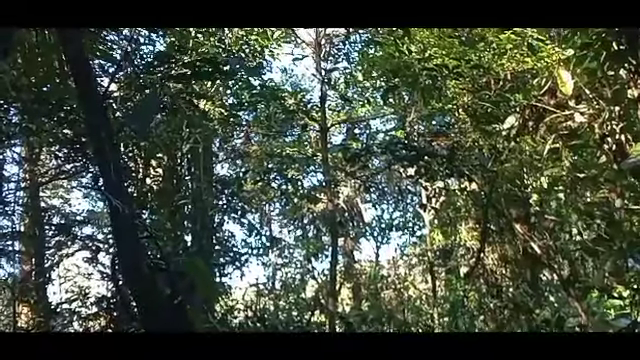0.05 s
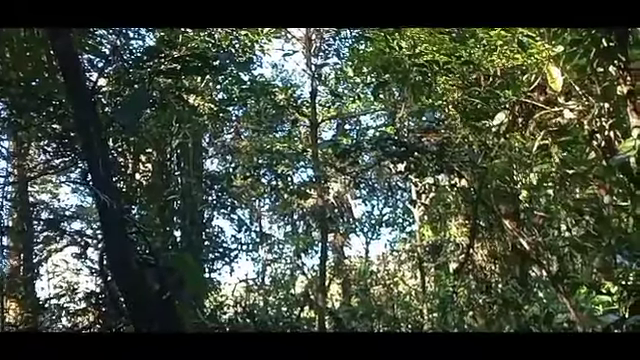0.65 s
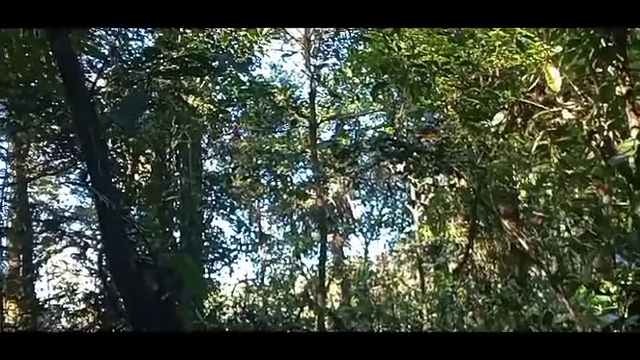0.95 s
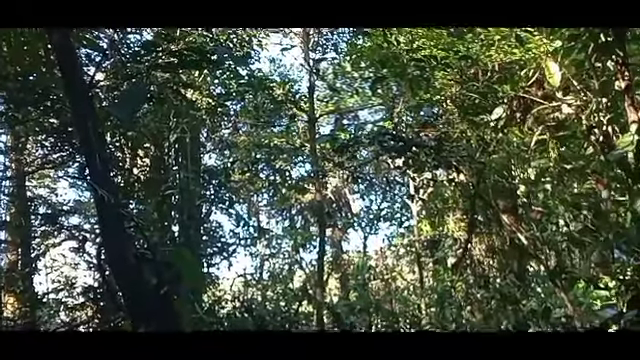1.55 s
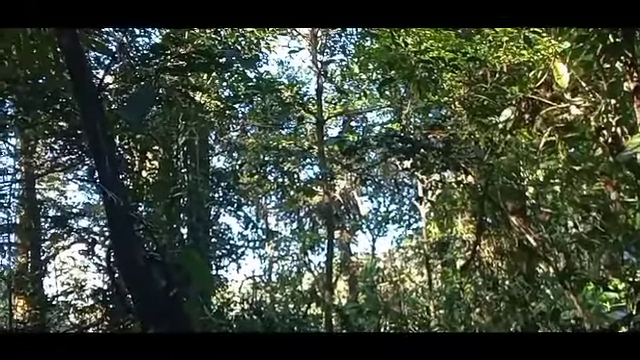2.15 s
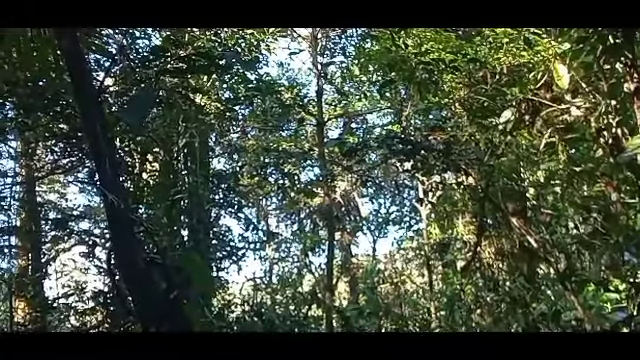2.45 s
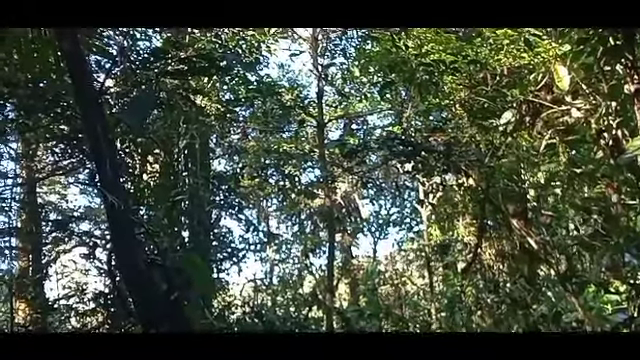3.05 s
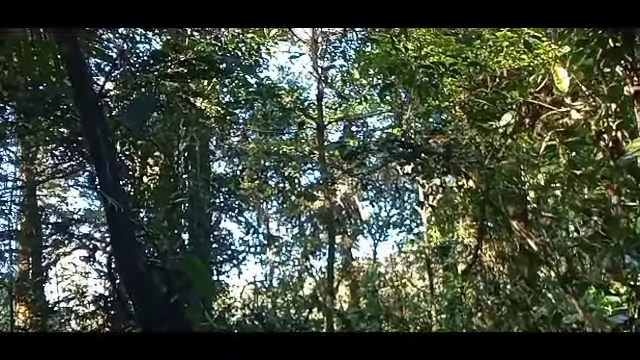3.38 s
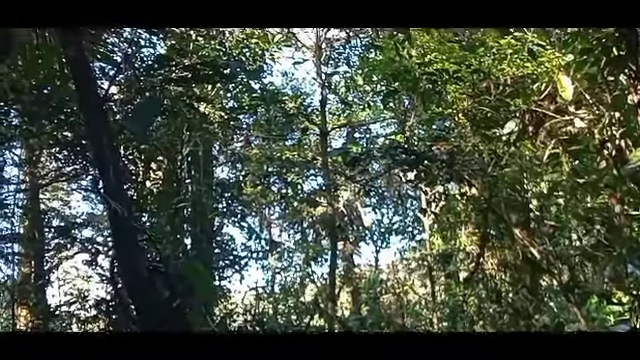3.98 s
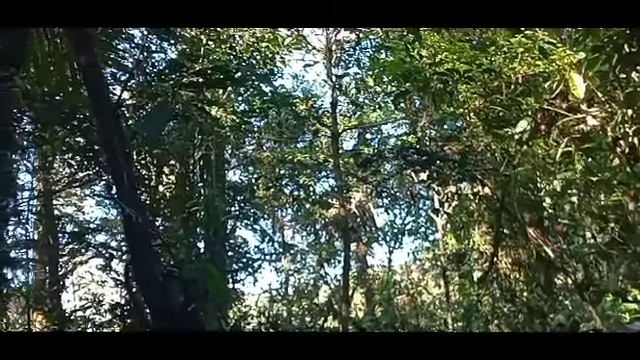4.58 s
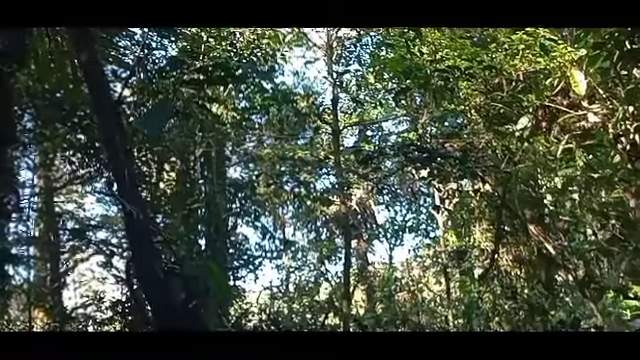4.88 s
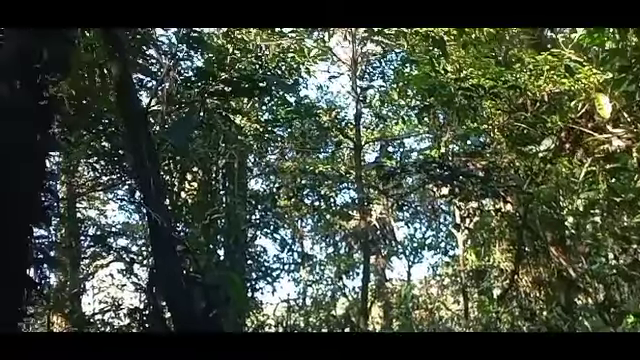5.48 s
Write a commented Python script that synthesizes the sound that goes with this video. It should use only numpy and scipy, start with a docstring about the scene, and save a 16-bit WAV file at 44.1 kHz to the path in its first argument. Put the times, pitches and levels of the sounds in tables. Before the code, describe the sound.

Small birds sing throughout in a forest, mostly to the left of the microphone. Thin, high calls slide downward over distant twittering, while one bird repeats a lower, plaintive whistle and others add short chips and raspy chatter, all lightly echoing among the trees. A few low, dull knocks sound close on the right at the start, with a brief rustle of leaves, and again a little later.

```python
"""Small birds call in a wood, mostly to the left: thin, high syrinx tones slide downward, while one bird
repeats a lower, plaintive whistle and others add short chips over a distant twittering chorus.
Scattering by foliage and trunks smears every note. Close by, a damped body gives a few low knocks on
the right, and leaves and undergrowth stir in brief bursts of noise over a faint outdoor rumble."""
import sys
import numpy as np
from scipy import signal
from scipy.fft import rfft, irfft, next_fast_len
from scipy.io import wavfile
from scipy.ndimage import map_coordinates

SR = 44100
rng = np.random.default_rng(int(sys.argv[2]) if len(sys.argv) > 2 else 0)


def transcribe(signal):
    """Save signal, clipped to [-1, 1], as a 16-bit WAV file at the path in sys.argv[1]."""
    frames = np.atleast_2d(signal).T
    limited = np.clip(frames, -1, 1)
    pcm = np.round(limited * 32767).astype(np.int16)
    wavfile.write(sys.argv[1], SR, pcm)


N = 243431
THROUGH = np.linspace(0, 1, 48)  # the way through a note, start to end


# Envelope of a slide: position_fraction, level_db
SLIDE_ENVELOPE = [(0, -4), (0.15, 3.5), (.4, 3), (.7, -1.5), (1, -6.5)]
# Long falling calls: start_s, length_s, level_db, top_hz, asymptote_hz, time_constant_s, stall_fraction
SLIDES = [(0.04, 0.18, -20.5, 7374, 3926, 0.06, .8), (1.224, 0.22, -21, 7430, 4284, 0.061, 0.3),
          (1.329, .235, -23, 7734, 3002, .15, 0.87), (2.379, 0.15, -21.5, 7274, 3944, 0.046, .7),
          (2.626, 0.21, -21, 7354, 4063, .068, 0.3), (4.161, 0.16, -21, 7270, 3818, .06, .7)]
def sliding_calls(hold_s=.016, swell_s=.014):
    """Exponential relaxation: the pitch falls steeply, then flattens, as the rough tone clears."""
    out = np.zeros((2, N))
    for start, length, db, top_hz, asymptote_hz, fall_s, stall in SLIDES:
        falling = np.maximum(THROUGH * length - hold_s, 0)
        pitches = stepped(asymptote_hz + (top_hz - asymptote_hz) * np.exp(-falling / fall_s), stall)
        waver = np.linspace(.018, .003, int(length * SR))
        tone = note(length, pitches, waver, flutter_db=2.5, edge=swell_s / length)
        level = np.interp(np.linspace(0, 1, len(tone)), *np.transpose(SLIDE_ENVELOPE))
        add(out, start, amp(db) * wood(unit(tone * amp(level)), leaves_db=-1, trunks_db=-6))
    return out


def stepped(hz, stall, step_hz=698.7):
    """Soft quantisation: a falling pitch lingers on a ladder of steps, placed anew for each call."""
    phase = 2 * np.pi * (hz / step_hz + rng.random())
    return hz + stall * step_hz / (2 * np.pi) * np.sin(phase)


# Held notes that break: start_s, hold_s, level_db, held_hz, end_hz, sag_oct_per_s
HOOKS = [(0.167, 0.042, -18.5, 7030, 5310, .2), (0.658, 0.04, -18, 7034, 4860, .2),
         (1.4, 0.05, -17, 6613, 5460, .8), (2.011, .038, -21.5, 7007, 5730, .3),
         (2.845, 0.043, -19, 6930, 5280, 2), (3.237, 0.041, -25, 6930, 4820, .2),
         (3.625, 0.016, -23, 6440, 5400, 3), (3.856, 0.027, -25.5, 7060, 5240, 1.3),
         (4.447, 0.047, -20, 7154, 5970, 3.2), (4.494, 0.054, -21.5, 5762, 4180, 0.31),
         (4.569, 0.028, -31.5, 4490, 3740, 4), (5.203, 0.029, -20.5, 7272, 5500, 1.1),
         (5.262, 0.016, -22.5, 6117, 4560, 1), (5.337, 0.029, -20.5, 7040, 5560, 2.2),
         (5.379, 0.02, -23, 5450, 4550, 7.9)]
def hooked_calls(plunge_oct_per_s=12, fade_db_per_s=273.5, accent_db=2.5, accent_s=.017):
    """A two-stage frequency sweep: a held tone sags, is accented at the break, then plunges and fades."""
    out = np.zeros((2, N))
    for start, hold, db, hz, end_hz, sag in HOOKS:
        length = hold + np.log2(hz / end_hz) / plunge_oct_per_s
        t = THROUGH * length
        pitches = hz * 2 ** (-sag * np.minimum(t, hold) - plunge_oct_per_s * np.maximum(t - hold, 0))
        tone = note(length, pitches, waver=.01, flutter_db=2, edge=.1)
        since_break = np.arange(len(tone)) / SR - hold
        accent = accent_db * np.exp(-(since_break / accent_s - .5) ** 2)
        fade = fade_db_per_s * np.maximum(since_break, 0)
        call = unit(tone * amp(accent - fade))
        echo_db = 4 + .5 * (-18 - db)  # fainter calls have a larger share of echo
        add(out, start, amp(db) * wood(call, leaves_db=echo_db, trunks_db=echo_db - 4))
    return out


# Lower whistles: start_s, length_s, level_db, end_hz, sag_hz, bend_ratio, swell_db
WHISTLES = [(0.857, 0.19, -38.5, 3297, 375, 5, 16), (1.136, 0.33, -40.5, 3209, 308, 6, -13.5),
            (1.481, .215, -39, 3146, 197.3, 5, -24.5), (1.716, 0.27, -38, 3105, 354, 6.5, -2.5),
            (2.047, 0.25, -39, 2510, 764, -1.65, -11.5), (2.859, 0.2, -49, 3190, 150, 3, 8.5),
            (3.171, 0.21, -50, 3063, 205, 4, 0), (3.466, .265, -54.5, 2758, 439, 1.5, -8),
            (4.567, 0.24, -46.5, 3324, 198.5, 7, -8), (4.874, 0.25, -42.5, 3318, 257.5, 5, 18.5),
            (5.186, 0.17, -44.5, 3098, 246, 0.5, 1.5)]
def whistler():
    """A high direct-to-reverberant ratio makes one bird's sagging whistle the driest voice."""
    out = np.zeros((2, N))
    for start, length, db, end_hz, sag_hz, bend, swell_db in WHISTLES:
        fallen = np.expm1(-bend * THROUGH) / np.expm1(-bend)  # a positive bend falls early
        pitches = end_hz + sag_hz * (1 - fallen)
        tone = note(length, pitches, waver=.005, flutter_db=3.2, edge=.24, fade_db=-swell_db)
        add(out, start, amp(db) * wood(tone, leaves_db=-7, trunks_db=-14))
    return out


# High pips, rising or falling: start_s, level_db, glide_oct
PIPS = [(1.056, -28, 0.056), (1.159, -25.5, -0.17), (2.945, -22, 0.1), (3.07, -19.5, 0.12),
        (3.177, -23.5, -0.04), (3.46, -37, 0.15), (3.522, -34, 0.18), (3.574, -29, 0.3),
        (3.799, -29.5, 0.13), (4.808, -23.5, -0.26), (4.995, -45.5, 0.26)]
# Raspy chatter: start_s, level_db, pitch_hz
CHATTER = [(0.416, -40, 4240), (0.5, -27, 5610), (1.069, -32.5, 4780), (1.714, -36.5, 6250),
           (1.79, -32.5, 4680), (1.872, -33.5, 4494), (1.95, -27.5, 4567), (2.072, -29.5, 4394),
           (2.18, -31.5, 4620), (2.261, -26.5, 4350), (2.968, -27.5, 6180), (5.0, -40, 5220)]
# Soft low peeps: start_s, level_db, pitch_hz
PEEPS = [(1.875, -37, 3780), (1.985, -42.5, 3810), (2.111, -33.5, 3753), (3.472, -40, 3780),
         (3.584, -46, 3816), (3.676, -47, 3713), (3.815, -44.5, 3733), (3.971, -56.5, 2647),
         (4.108, -48, 2820), (4.248, -53.5, 2653), (4.372, -51.5, 2818), (4.434, -54.5, 2686)]
# Hoarse far notes, mostly echo: start_s, level_db, pitch_hz
FAR_NOTES = [(1.919, -56, 2790), (1.991, -48.5, 2605), (2.279, -46, 2690), (2.46, -49, 2633),
             (4.139, -59, 2490), (4.32, -48.5, 3240)]
def chips():
    """Reverberation draws out brief frequency sweeps sung from deeper in the foliage."""
    out = np.zeros((2, N))
    for start, db, octaves in PIPS:
        tone = note(.025, glide(6450, octaves), waver=.018, flutter_db=2.5, edge=.1, fade_db=10.5)
        add(out, start, amp(db) * wood(tone, leaves_db=5.5, trunks_db=1.5))
    for start, db, hz in CHATTER:
        add(out, start, amp(db) * wood(chatter(hz), leaves_db=4, trunks_db=-1, trunks_t60=.5))
    for start, db, hz in PEEPS:
        tone = note(.047, glide(hz, octaves=.052), waver=.01, flutter_db=3, edge=.4)
        add(out, start, amp(db) * wood(tone, leaves_db=-3, trunks_db=-7))
    for start, db, hz in FAR_NOTES:
        tone = note(.047, glide(hz, octaves=.2), waver=.04, flutter_db=3, edge=.5)
        add(out, start, amp(db) * wood(tone, leaves_db=5, trunks_db=3, trunks_t60=.55))
    return out


def chatter(hz, count=5, pulse_hz=125, climb_oct=.5):
    """A fast pulse train is heard as a rasp: tiny ticks climb in pitch as they swell and die."""
    run = np.zeros(SR // 8)
    for k in range(count):
        through = (k + 1) / (count + 1)
        pitches = glide(hz * 2 ** (climb_oct * (through - .5)), octaves=.2)
        tick = note(.012, pitches, waver=.02, flutter_db=2, edge=.3)
        add(run, k / pulse_hz, np.sin(np.pi * through) ** 2 * tick)
    return run


def note(length, pitches, waver, flutter_db, edge, fade_db=0):
    """A syrinx tone with random frequency and amplitude modulation; edge is each ramp's share of it."""
    u = np.linspace(0, 1, int(length * SR))
    hz = map_coordinates(np.array(pitches, float), [u * (len(pitches) - 1)], order=2, mode="nearest")
    quaver = .9 * wobble(55, len(u)) + wobble(160, len(u)) + wobble(700, len(u))
    hz = hz * (1 + waver * quaver)
    swell = np.sin(np.pi / 2 * np.clip(np.minimum(u, 1 - u) / edge, 0, 1))
    level = flutter_db * wobble(99.4, len(u)) - fade_db * u  # breath pressure drifts over the note
    return unit(swell * amp(level) * np.sin(2 * np.pi * np.cumsum(hz) / SR))


def wood(tone, leaves_db, trunks_db, leaves_t60=.13, trunks_t60=.75):
    """Multipath propagation: direct sound, quick scatter off leaves and a long tail among trunks."""
    t = np.arange(int(.8 * SR)) / SR
    path = np.zeros((2, len(t)))
    path[0, 35] = path[1, 0] = 1  # the direct sound lags 35 samples on the left
    lumps_db = 4 * wobble(70, len(t))  # single trunks stand out in the tail
    for db, t60 in (leaves_db, leaves_t60), (trunks_db, trunks_t60):
        decay = amp(lumps_db - 60 * t / t60) * (1 - np.exp(-60 * t / t60))
        path += amp(db) * decay / np.linalg.norm(decay) * rng.standard_normal(path.shape)
    return signal.fftconvolve(tone[None], path / np.linalg.norm(path[0]), axes=1)


# Levels of the distant flock: time_s, low_voices_db, high_voices_db
CHORUS = [(0.0, -36, -28.5), (0.42, -39.5, -32), (0.649, -43, -38), (0.999, -47, -40.5), (1.121, -44, -38),
          (1.7, -44, -41.5), (1.871, -39, -36), (2.35, -39, -39), (2.951, -40.5, -29.5),
          (3.198, -46, -39.5), (3.42, -62.5, -41), (3.56, -51.5, -43.5), (3.95, -52.5, -49.5),
          (4.121, -48.5, -39.5), (4.419, -53.5, -51), (4.76, -43, -37), (4.951, -48.5, -53),
          (5.19, -54.5, -59), (5.45, -35.5, -36)]
def far_flock():
    """Superposition of two registers of distant voices, each swelling and resting in its own time."""
    times, low_db, high_db = np.transpose(CHORUS)
    t = np.arange(N) / SR
    low = amp(np.interp(t, times, low_db)) * far_voices(3650, 4700, count=9)
    high = amp(np.interp(t, times, high_db)) * far_voices(4700, 7100, count=16)
    return low + high


def far_voices(low_hz, high_hz, count, notes=24):
    """Incoherent summation: short, mostly rising notes and their echoes merge into a twitter."""
    out, lead_in = np.zeros((2, N)), SR // 2
    for bird in range(count):
        song = np.zeros(N + lead_in)
        for k, (when, size, height, slope, loud) in enumerate(rng.random((notes, 5))):
            pitches = glide(low_hz + (high_hz - low_hz) * height, octaves=.55 * (slope - .35))
            tone = note(.012 + .03 * size, pitches, waver=.02, flutter_db=3, edge=.3)
            add(song, (k + when) / notes * len(song) / SR, amp(6 * loud) * tone)
        out += wood(song, leaves_db=4, trunks_db=5)[:, lead_in:lead_in + N]
    return unit(out)


# Modes of the struck body: mean_frequency_hz, level_db, t60_s
KNOCK_MODES = [(273, -22, 0.11), (403, 0.5, 0.017), (600, 12.5, 0.0049), (1010, 1, 0.0072),
               (2090, 6, 0.0038)]
# Blows: start_s, level_db, contact_s
KNOCKS = [(0.018, -21, 0.00011), (.070, -23.5, 0.0006), (0.111, -30.5, 0.00034), (1.388, -24.5, 0.00174),
          (1.805, -41, 0.0014), (1.834, -29.5, 0.0023), (5.157, -48.5, 0.00079)]
def knocks():
    """Impact excites the modes of a heavily damped body: the longer the contact, the duller the tap."""
    out, t = np.zeros(N), np.arange(SR // 8) / SR
    onset = (1 - np.exp(-t / .0006)) ** 2
    for start, db, contact in KNOCKS:
        ring = sum(amp(level - 60 * t / t60) * np.sin(2 * np.pi * hz * (1 + rng.normal(0, .11)) * t)
                   for hz, level, t60 in KNOCK_MODES)
        push = np.hanning(int(contact * SR) + 3)
        add(out, start, amp(db) * np.convolve(ring * onset, push / push.sum()))
    return out * amp([[-12], [-1]])  # to the right


# Spectrum of stirred leaves: frequency_hz, level_db
FLURRY_SPECTRUM = [(900, -44.5), (1500, -41), (1800, -10.5), (2100, -11), (2420, 1), (2800, -17.5),
                   (3100, -22.5), (3650, 1), (5000, -17), (8000, -67.5)]
def flurry():
    """Amplitude-modulated noise: a rasping stir of leaves on the left flickers as it dies away."""
    level = amp(-26 + 2 * wobble(110, N)) * brush(start=.12, rise_s=.039, t60=.43)
    return level * noise(FLURRY_SPECTRUM) * amp([[0], [-17]])


# Soft thuds: start_s, level_db
THUDS = [(0.123, -34), (1.403, -56.5), (2.005, -60.5), (5.139, -56)]
# Spectrum of a thud: frequency_hz, level_db
THUD_SPECTRUM = [(25, -52), (40, -38), (62, 0.5), (200, 1), (350, -13), (1200, -70)]
# Dry swishes: start_s, t60_s, level_db
SWISHES = [(0.12, 0.58, -44.5), (1.89, 0.49, -56.5), (4.642, 0.33, -56.5), (5.376, 0.33, -49.5),
           (5.459, 0.19, -51)]
# Spectrum of a swish: frequency_hz, level_db
SWISH_SPECTRUM = [(100, -3), (350, 1), (800, -4), (1400, -0.5), (2400, -17), (4000, -10), (7500, -28.5),
                  (9000, -58)]
# Balance of a swish: frequency_hz, left_minus_right_db
SWISH_TILT = [(600, -11.5), (1440, -12), (2440, 11)]
def rustles():
    """Contact noise: something brushes the undergrowth, giving low thuds and dry swishes."""
    thud_level = sum(amp(db) * brush(start, rise_s=.022, t60=.21) for start, db in THUDS)
    swish_level = sum(amp(db) * brush(start, rise_s=.03, t60=t60) for start, t60, db in SWISHES)
    leaves = filtered(noise(SWISH_SPECTRUM), lambda hz: amp([along(SWISH_TILT, hz), 0 * hz]))
    thud = unit(noise(THUD_SPECTRUM, channels=1) + .8 * noise(THUD_SPECTRUM))
    return thud_level * thud + swish_level * leaves * amp(1.7 * wobble(130, N))


def brush(start, rise_s, t60):
    """The envelope of one touch: a linear rise, then exponential decay."""
    t = np.arange(N) / SR - start
    return np.clip(t / rise_s, 0, 1) * amp(-60 * np.maximum(t - rise_s, 0) / t60)


# Outdoor rumble: frequency_hz, level_db
RUMBLE_SPECTRUM = [(25, -50), (45, -17), (70, -2.5), (120, -14.5), (250, -30.5), (1000, -44)]
# Thin hiss: frequency_hz, level_db
HISS_SPECTRUM = [(30, -3.5), (150, -2), (500, -4.5), (1500, -7.5), (3000, -9.5), (7000, -9.5), (9000, -29)]
def air():
    """Ambient noise: a faint rumble, coherent on both sides, under an incoherent hiss."""
    rumble = amp(-74 + .71 * wobble(30, N)) * noise(RUMBLE_SPECTRUM, channels=1)
    return rumble + amp(-67) * noise(HISS_SPECTRUM)


def glide(hz, octaves):
    """An exponential pitch sweep centred on hz."""
    return hz * 2 ** (octaves * (THROUGH - .5))


def amp(db):
    """Decibels to amplitude ratio."""
    return 10 ** (np.asarray(db) / 20)


def unit(x):
    """Normalisation to rms 1."""
    return x / np.sqrt(np.mean(x ** 2) + 1e-20)


def along(points, hz):
    """Interpolation of (frequency_hz, value) points on a log frequency axis."""
    frequencies, values = np.transpose(points)
    return np.interp(np.log(hz + 1), np.log(frequencies + 1), values)


def filtered(x, response):
    """Linear filtering: the spectrum of x times a frequency response."""
    size = next_fast_len(N + 8192)
    return irfft(rfft(x, size) * response(np.fft.rfftfreq(size, 1 / SR)), size)[..., :N]


def noise(spectrum, channels=2):
    """Coloured noise of rms 1, uncorrelated between channels."""
    return unit(filtered(rng.standard_normal((channels, N)), lambda hz: amp(along(spectrum, hz))))


def wobble(rate, size):
    """Smooth random modulation: a spline with rate knots a second."""
    return map_coordinates(rng.standard_normal(4096), [np.arange(size) * rate / SR], mode="wrap")


def add(track, start_s, sound):
    """Superposition of a sound on a track from start_s."""
    start = max(0, round(start_s * SR))
    room = track[..., start:start + sound.shape[-1]]
    room += sound[..., :room.shape[-1]]


# Band of birdsong that reaches the listener: frequency_hz, gain_db
BIRD_BAND = [(5800, 1.5), (7150, -5.5), (7600, -3), (8100, -21.5), (9000, -59)]
# Balance of the birds: frequency_hz, right_minus_left_db
BIRD_TILT = [(2400, -8.5), (3300, -16.5), (4200, -27.5), (7000, -30)]
def scene():
    """Level difference places the birds on the left, the more so the higher they sing."""
    birds = sliding_calls() + hooked_calls() + whistler() + chips() + far_flock()
    sides = lambda hz: amp(along(BIRD_BAND, hz)) * amp([0 * hz, along(BIRD_TILT, hz)])
    return filtered(birds, sides) + knocks() + rustles() + flurry() + air()


def record(dry, top_hz=15800):
    """Spectral imaging: a converter leaks a faint mirror of the treble and passes nothing above top_hz."""
    mirror = dry * (-1) ** np.arange(N)  # each frequency f moves to SR / 2 - f
    leak = filtered(mirror, lambda hz: amp(along([(13000, -8.5), (15000, -38), (15800, -32.5)], hz)))
    return filtered(dry + leak, lambda hz: hz < top_hz)


dry = scene()
out = record(dry)
transcribe(out)
```